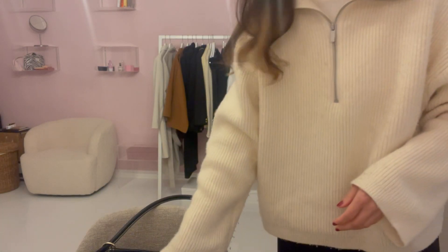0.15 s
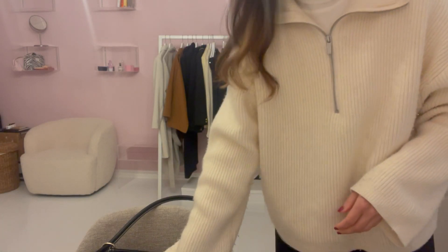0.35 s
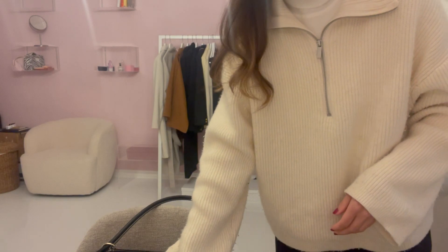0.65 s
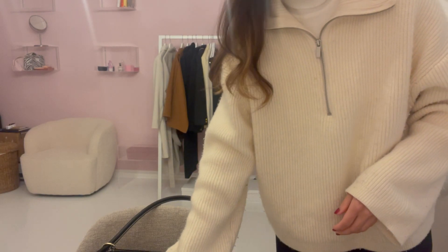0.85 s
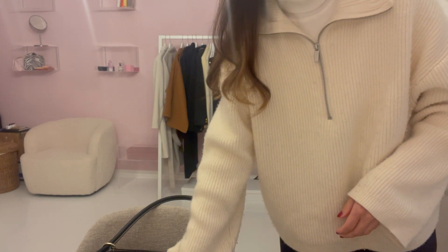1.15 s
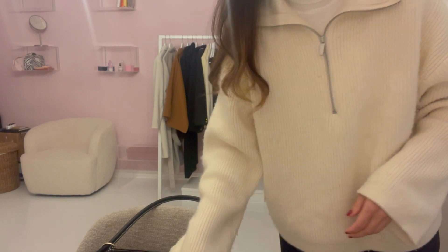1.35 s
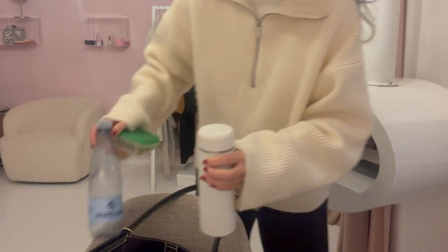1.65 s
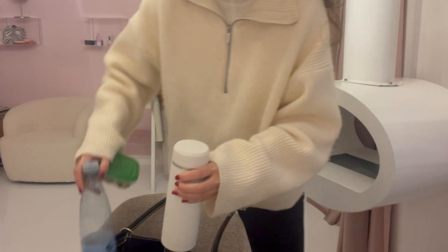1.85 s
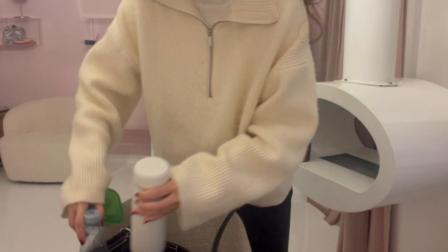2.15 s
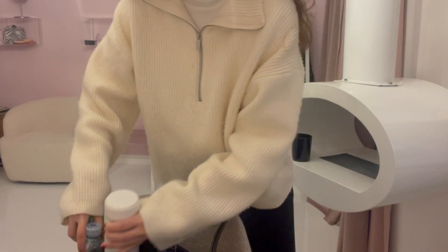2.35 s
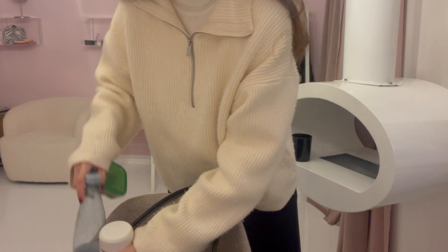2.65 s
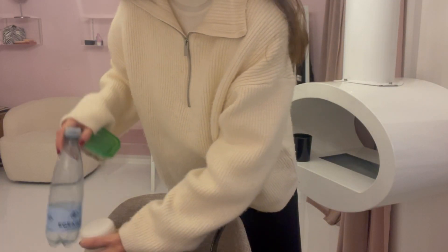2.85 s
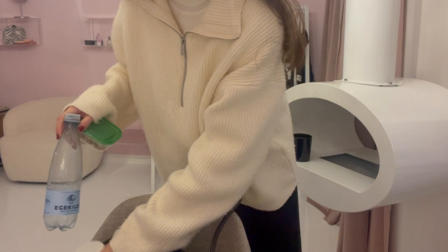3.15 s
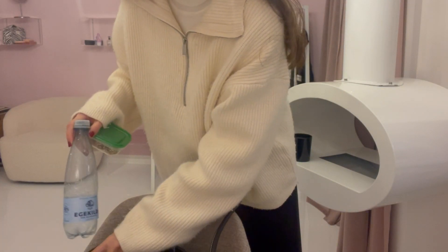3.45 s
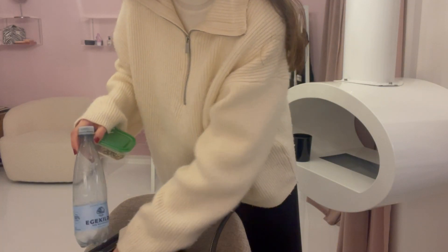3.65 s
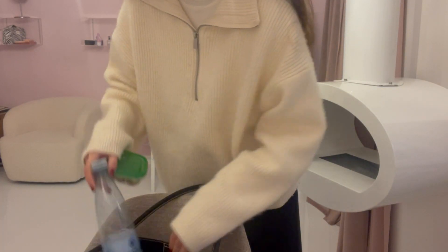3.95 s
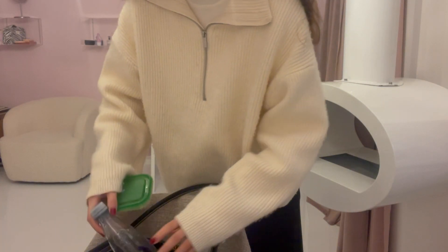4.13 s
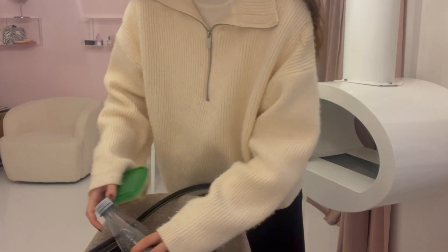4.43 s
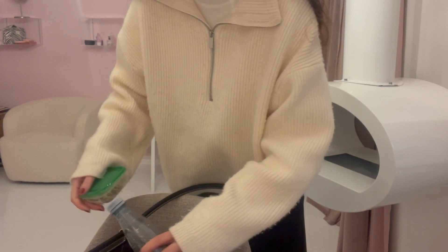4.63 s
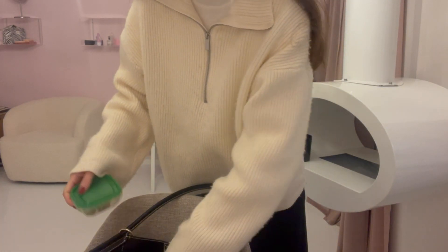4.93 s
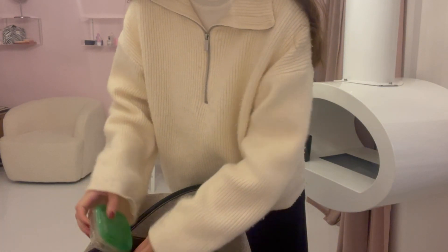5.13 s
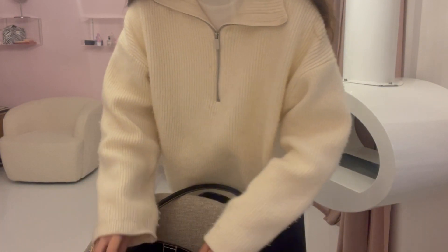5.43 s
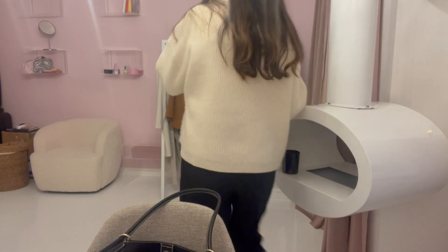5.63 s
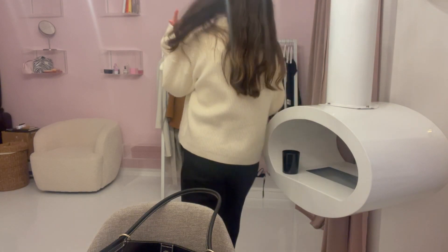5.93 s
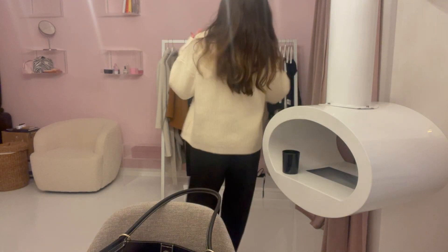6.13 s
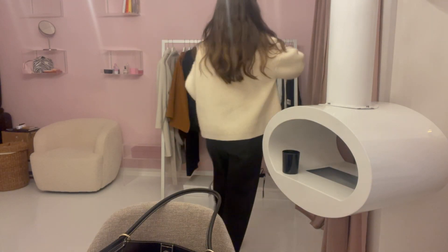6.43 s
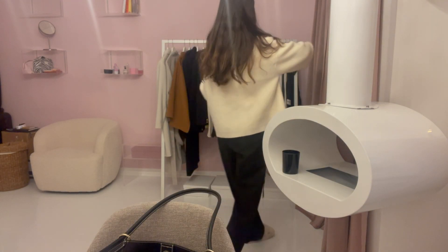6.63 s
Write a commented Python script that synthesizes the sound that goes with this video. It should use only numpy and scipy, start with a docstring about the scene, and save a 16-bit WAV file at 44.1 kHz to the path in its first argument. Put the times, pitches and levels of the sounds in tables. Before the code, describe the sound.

Close stereo microphone in a small room, with faint low rumble and hiss. Leather creaks and rubs with soft thumps, then a quiet pause. A flask goes into a handbag with a dull, boomy thump, sleeves swishing and plastic clicking. A water bottle clatters sharply against it, and a small lidded box drops with a hollow clop. An abrupt cut leaves only soft steps and sweater swish.

```python
"""Packing a leather handbag

In a small room a flask, a plastic water bottle and a small lidded box go into a leather handbag.
Filtered friction noise makes sleeves, lining and scuffs; struck modes and noise bursts make the taps,
the clattering bottle, the dropping box and the thumps on the bottom of the bag. The sound breaks off
and goes on with soft steps and the swish of a sweater, over the faint rumble and hiss of the room."""
import sys
import numpy as np
from scipy import signal
from scipy.fft import rfft
from scipy.io import wavfile
from scipy.ndimage import uniform_filter1d

SR = 44100
rng = np.random.default_rng(int(sys.argv[2]) if len(sys.argv) > 2 else 0)


def generate_wav(signal):
    """Clip the signal to [-1, 1] and save it as 16-bit WAV at the path in sys.argv[1]."""
    frames = np.transpose(np.atleast_2d(signal))
    scaled = np.clip(frames, -1, 1) * 32767
    pcm = np.round(scaled).astype(np.int16)
    wavfile.write(sys.argv[1], SR, pcm)


N = 299206
T = np.arange(N) / SR
RING_T = T[:SR * 3 // 5]  # time axis of a single blow or of the echo


# Colour of rubbed leather: freq_hz, density_db (relative, per Hz)
LEATHER_COLOUR = [(150, 1.5), (250, 4.5), (340, 1.5), (540, -0.5), (850, -9), (1120, -11), (1680, -23),
                  (2300, -40), (4000, -31), (7000, -62), (14000, -82)]
# Colour of sliding fabric: freq_hz, density_db (relative, per Hz)
FABRIC_COLOUR = [(900, -24), (1700, 9.5), (2200, 9.5), (2900, 6), (3400, 4.5), (3900, 4), (4500, 6),
                 (7000, 0), (10000, 4.5), (12500, 1), (16000, 0.5)]
# Colour of the rumbling bag: freq_hz, density_db (relative, per Hz)
BAG_RUMBLE_COLOUR = [(60, -2), (100, -1), (126, 9), (165, -0.5), (212, 3.5), (270, -21.5), (400, -50.5)]
# While hard things lie loose in the bag: from_s, to_s
LOOSE_SPAN = (1.7, 5.55)


def handling(rub_db=-2, swish_db=-3, rumble_db=4.5, sway_s=0.43, jostle_db=-11):
    """Things rub the leather and jostle, sleeves and lining swish and crinkle; rubbing makes the bag rumble."""
    rubbing, swishing = strokes()
    loose = (T > LOOSE_SPAN[0]) & (T < LOOSE_SPAN[1])
    leather = undb(rub_db) * colour(friction(rate=350, spread_db=0.5, smooth=1.0), LEATHER_COLOUR)
    contents = undb(jostle_db) * loose * grains(count=170, centre_hz=1100, t60=0.035)
    swish = colour(friction(rate=900, spread_db=-1.0, smooth=0.76), FABRIC_COLOUR)
    folds = undb(-4) * loose * grains(count=300, centre_hz=3600, t60=.014)
    # the heavy bag follows the rubbing only on average
    sway = uniform_filter1d(rubbing, max(int(sway_s * SR), 1))
    body = undb(rumble_db) * sway * colour(rng.standard_normal(N), BAG_RUMBLE_COLOUR)
    pressure = grip(depth_db=2.3, hold_s=.016)
    rubbed = rubbing * (leather + contents)
    swished = undb(swish_db) * swishing * (swish + folds)
    return (rubbed + swished) * pressure + body


# Strokes of hand and arm: start_s, length_s, leather_rub_db, fabric_swish_db
HAND_STROKES = [(-0.05, 0.055, -44, -66), (0.047, 0.58, -61.5, -68.5), (0.214, 0.027, -51, -63),
                (0.329, 0.18, -49, -69.5), (0.542, 0.12, -52, -80.5), (0.67, 0.2, -51, -85),
                (1.609, 0.072, -52, -63.5), (1.873, 0.071, -45, -63.5), (2.003, 0.11, -56.5, -61.5),
                (2.175, 0.15, -55.5, -59.5), (2.347, 0.11, -57, -59.5), (2.463, 0.16, -47.5, -53),
                (2.621, 0.13, -53, -59.5), (2.744, 0.18, -61.5, -63), (2.919, 0.15, -54.5, -54.5),
                (3.042, 0.061, -49.5, -61), (3.215, 0.11, -64.5, -60.5), (3.303, 0.076, -52.5, -51),
                (3.453, 0.036, -47, -54.5), (3.503, 0.049, -45, -52), (4.126, 0.21, -59.5, -64.5),
                (4.793, 0.29, -48, -54.5), (5.297, 0.16, -46, -55), (5.63, 0.09, -57.5, -68.5),
                (5.785, 0.11, -74, -63), (5.922, 0.048, -48, -53), (5.99, 0.13, -57.5, -65.5),
                (6.136, 0.27, -77, -68.5), (6.39, 0.15, -62.5, -65.5), (6.567, 0.093, -63.5, -65)]
RUB_ATTACK_S, SWISH_ATTACK_S = 0.085, 0.057
STROKE_SAG_DB_PER_S, STROKE_RELEASE_S = 11, 0.039


def strokes():
    """Gains of rubbing and swishing: attack, sagging hold and release, with a separate attack for each."""
    rub, swish = np.zeros(N), np.zeros(N)
    for start, length, rub_db, swish_db in HAND_STROKES:
        t = RING_T - min(start, 0)  # a stroke with a negative start is already under way
        rub_attack = np.sin(np.pi / 2 * np.minimum(t / RUB_ATTACK_S, 1)) ** 2
        swish_attack = np.sin(np.pi / 2 * np.minimum(t / SWISH_ATTACK_S, 1)) ** 2
        release = np.exp(-np.maximum(t - length, 0) / STROKE_RELEASE_S)
        shape = undb(-STROKE_SAG_DB_PER_S * t) * release
        add(rub, start, undb(rub_db) * rub_attack * shape)
        add(swish, start, undb(swish_db) * swish_attack * shape)
    return rub, swish


def grip(depth_db, hold_s):
    """The pressure of the hand wavers at random."""
    steps = np.arange(0, T[-1] + 1, max(hold_s, .005))
    return undb(depth_db * np.interp(T, steps, rng.standard_normal(len(steps))))


# The water bottle tumbles in: start_s, level_db, contact_ms
BOTTLE_BLOWS = [(4.8937, -15, 0.26), (4.8967, -28, 0.28), (4.9047, -16, 0.24), (4.912, -19, 0.4),
                (4.919, -17.5, 0.46), (4.9497, -19, 0.3), (4.9528, -21.5, 0.4), (4.9746, -25.5, 0.88)]
# What its wall rings with: pitch_hz, level_db, t60_s
BOTTLE_WALL = [(300, -10, 0.37), (408, -20.5, 0.58), (480, 0.5, 0.035), (635, -6, 0.094),
               (891, -10.5, 0.15), (1063, 4, 0.089), (1070, 8.5, 0.058), (1140, 1, 0.15), (1507, 0, 0.13),
               (1684, 10, 0.054), (1740, 7, 0.095), (2130, 5, 0.06), (2220, -6, 0.12), (2614, -8, 0.066),
               (2936, -12.5, 0.045), (3390, -3, 0.041), (3630, -1, 0.11), (3847, 1.5, 0.15)]


def bottle(ring_db=-1, crack_db=-6, snap_db=-7, tick_db=-8, rebound_db=-15):
    """The bottle slips from the hand and chatters against the flask; its stiff wall cracks and rings."""
    out = np.zeros(N)
    for start, db, contact_ms in BOTTLE_BLOWS:
        crack = undb(crack_db) * burst(430, 2600, t60=0.024)
        snap = undb(snap_db) * burst(2000, 4100, t60=.012)
        wall = undb(ring_db) * ring(BOTTLE_WALL, detune=0.004, strike_db=4) + crack + snap
        tick = undb(tick_db) * burst(6000, 15000, t60=0.01)
        add(out, start, undb(db) * soften(chatter(wall, rebound_db) + tick, contact_ms))
    return out


def chatter(x, db, rate=300, t60=0.12):
    """A blow is followed by small, irregular rebounds that die away."""
    moments = rng.random(len(x)) < rate / SR
    rebounds = undb(db) * moments * rng.standard_normal(len(x)) * fade(t60)
    return x + signal.fftconvolve(x, rebounds)[:len(x)]


# The box bumps the rim, drops and settles: start_s, level_db, contact_ms
BOX_BLOWS = [(5.1337, -30, 0.43), (5.302, -25, 0.39), (5.3428, -11.5, 0.12), (5.4102, -25, 0.11)]
# What its thin walls ring with: pitch_hz, level_db, t60_s
BOX_WALLS = [(435, 4, 0.28), (523, 0.5, 0.03), (660, 16.5, 0.036), (920, -3, 0.044), (1000, 14, 0.033),
             (1142, 11.5, 0.15), (1486, 0.5, 0.086), (1970, 14.5, 0.033), (2667, 2, 0.069)]
# The lid flexing on the air inside: pitch_hz, swell_s
BOX_LID = (710, .0018)


def box(wall_db=-12, tick_db=-11, rattle_db=-14.5):
    """The box lands with a sharp tick; its lid swells briefly into a hollow clop; walls and contents ring on."""
    hz, swell_s = BOX_LID
    lid_swell = RING_T / swell_s * np.exp(1 - RING_T / swell_s)
    lid = lid_swell * np.sin(2 * np.pi * hz * RING_T)
    clop = 0.73 * lid + undb(wall_db) * ring(BOX_WALLS)
    out = np.zeros(N)
    for start, db, contact_ms in BOX_BLOWS:
        contents = undb(rattle_db) * burst(570, 1050, t60=0.1374, rise_s=0.00057)
        tick = undb(tick_db) * burst(1400, 16500, t60=0.025)
        add(out, start, undb(db) * soften(clop + contents + tick, contact_ms))
    return out


# Light taps among the things: start_s, level_db, hardness (0 leather, 0.5 plastic, 1 metal fitting)
LIGHT_TAPS = [(0.073, -45, 0.015), (0.298, -46, 0.018), (0.375, -45, 0.036), (0.435, -35.5, 0.096),
              (0.444, -30, 0.088), (1.7593, -30.5, 0.32), (1.906, -33, 0.33), (2.0012, -38, 0.44),
              (2.217, -50.5, 0.82), (2.272, -34, 0.69), (2.395, -53.5, 0.67), (2.767, -55.5, 0.81),
              (2.907, -48.5, 0.29), (2.946, -48, 0.2), (3.045, -32, 0.16), (3.063, -37.5, 0.035),
              (3.133, -52, 0.75), (3.326, -46, 0.71), (3.344, -35.5, 0.84), (3.355, -40.5, 0.78),
              (3.366, -47, 1), (3.387, -41.5, 1), (3.3908, -48, 1), (3.434, -46, 0.8), (3.467, -39.5, 0.83),
              (3.541, -39, 0.21), (3.56, -45, 0.72), (3.881, -47, 0.68), (4.02, -35.5, 0.62),
              (4.178, -47, 0.36), (4.243, -46, 0.75), (4.272, -44, 0.27), (4.331, -41.5, 0.68),
              (4.684, -26.5, 0.36), (4.702, -38, 0.68), (4.818, -35.5, 0.5), (4.852, -32, 0.5),
              (5.017, -37, 0.6), (5.093, -38, 0.15), (5.136, -29.5, 0.4), (5.215, -40, 0.25),
              (5.471, -35.5, 0.59), (5.642, -48, 0.17), (5.948, -42.5, 0.86), (6.438, -49, 0.25)]
# What tapped plastic rings with: pitch_hz, level_db, t60_s
PLASTIC_MODES = [(1120, 1.5, 0.039), (1275, -3, 0.0074), (1648, 3.5, 0.036), (2115, 6, 0.011),
                 (2580, 6.5, 0.015), (3160, 0.5, 0.015)]
# What the tapped bag rings with: pitch_hz, level_db, t60_s
LEATHER_MODES = [(162.7, -2, 0.27), (229, -6, 0.24), (308.5, -12, 0.33), (423, -7.5, 0.015),
                 (553, 0.5, 0.034), (640, -8.5, 0.0217)]
HARDNESS_DB = 45  # fading of a voice per unit of hardness away from its own, relative to the nearest voice


def taps(knock_db=5, click_db=3, thud_db=3, contact_ms=0.29):
    """Soft taps are a hollow, scuffing thud of the bag, harder ones a plastic knock, the hardest a bare click."""
    out = np.zeros(N)
    for start, db, hardness in LIGHT_TAPS:
        away = np.abs(hardness - np.array([0, .5, 1]))
        thud, knock, click = db - HARDNESS_DB * (away - away.min())
        wall = ring(PLASTIC_MODES, detune=.045, strike_db=4)
        plastic = wall + .2 * burst(900, 4000, t60=0.06)
        leather = ring(LEATHER_MODES, detune=0.056) + .5 * burst(410, 754, t60=0.028)
        blow = undb(knock + knock_db) * plastic + undb(thud + thud_db) * leather
        bare_click = undb(click + click_db) * burst(4000, 14620, t60=0.011)
        add(out, start, soften(blow, contact_ms) + bare_click)
    return out


# Things landing on the bottom of the bag: start_s, level_db, pitch_hz
BAG_THUMPS = [(0.076, -41, 140.6), (0.365, -37, 153), (0.438, -28.5, 190), (0.452, -29, 130),
              (0.503, -30, 111.6), (1.909, -37.5, 145), (2.03, -35, 164.6), (2.056, -21.5, 129),
              (2.602, -30, 145), (4.25, -40.5, 116.6), (4.687, -41, 189), (4.821, -36.5, 147),
              (5.344, -35.5, 149.5), (5.493, -40.5, 222), (5.518, -45.5, 111)]
# Weight bearing on the chair under the bag: start_s, level_db
SEAT_BOOMS = [(1.763, -42.5), (2.095, -25), (2.539, -36), (3.093, -46.5), (5.124, -44), (5.408, -50.5)]
THUMP_T60_S = 0.22
SEAT_HZ, SEAT_T60_S = 127.1, 0.56


def thumps(bag_db=1, seat_db=1):
    """The bottom of the bag thumps briefly; the seat beneath it booms on at one pitch."""
    out = np.zeros(N)
    for start, db, hz in BAG_THUMPS:
        add(out, start, undb(db + bag_db) * boom(hz, THUMP_T60_S))
    for start, db in SEAT_BOOMS:
        add(out, start, undb(db + seat_db) * boom(SEAT_HZ, SEAT_T60_S))
    return out


# Things dragged over the rim and the seams: start_s, length_s, level_db, centre_hz
RIM_SCRAPES = [(0.433, 0.11, -47.5, 310), (0.44, 0.083, -56.5, 2070), (1.753, 0.06, -52.5, 1540),
               (2.007, 0.061, -52, 2250), (2.014, 0.087, -46, 420), (2.642, 0.11, -54, 11500),
               (2.817, 0.054, -56, 5500), (2.82, 0.082, -53.5, 11500), (3.336, 0.11, -52.5, 650),
               (4.224, 0.22, -68, 645), (4.337, 0.065, -60, 2030), (4.673, 0.094, -42, 284),
               (4.822, 0.1, -47, 1440), (4.838, 0.062, -43, 657), (5.396, 0.027, -56, 633),
               (5.463, 0.063, -42.5, 287)]
SCRAPE_OCTAVES = 1.26  # width of the band of a scrape


def scrapes(gain_db=0, ring_share=0.27, attack_s=0.0066, release_s=0.051):
    """Dense stick-slip clicks, partly heard through ringing plastic, each drag in its own register."""
    slips, out = friction(rate=840, spread_db=0.5, smooth=0.32), np.zeros(N)
    reach = 2 ** (SCRAPE_OCTAVES / 2)
    for start, length, db, hz in RIM_SCRAPES:
        catches = slips[int(start * SR):int((start + max(length, .01)) * SR)]
        t = T[:len(catches)]
        plastic = signal.fftconvolve(catches, ring(PLASTIC_MODES, detune=0.1005))[:len(t)]
        both = unit(catches) + ring_share * unit(plastic)
        drag = unit(band(both, hz / reach, hz * reach))
        shape = np.minimum(t / attack_s, 1) * np.minimum((t[-1] - t) / release_s, 1)
        add(out, start, undb(db + gain_db) * drag * shape)
    return out


# Flask and bottle sliding against each other and the rim: start_s, length_s, level_db, register_hz
SHELL_SLIDES = [(2.33, 0.18, -68.5, 1950), (2.526, 0.0072, -43.5, 1660), (2.55, 0.15, -59.5, 1450),
                (2.94, .11, -75, 2350), (3, 0.15, -69.5, 3950), (3.325, 0.056, -58.5, 2790),
                (4.81, 0.048, -55, 2620), (4.98, 0.14, -57.5, 1634), (5.03, 0.08, -60, 4200)]
# What their shells ring with: pitch_hz, level_db, t60_s
SHELL_RINGS = [(1164, 3.5, 0.029), (1667, -0.5, 0.056), (2040, -1, 0.021), (2793, -2.5, 0.043),
               (3430, -9.5, 0.045), (3860, -5, 0.089), (4930, -5, .025)]


def slides(gain_db=0, focus_db_per_octave=11):
    """Flask and bottle judder past each other; slips ring their shells, most near the contact's register."""
    slips, out = friction(rate=170, spread_db=3, smooth=0.068), np.zeros(N)
    for start, length, db, centre_hz in SHELL_SLIDES:
        push = swell(length)
        modes = []
        for hz, level_db, t60 in SHELL_RINGS:
            octaves_away = abs(np.log2(hz / centre_hz))
            modes.append((hz, level_db - focus_db_per_octave * octaves_away, t60))
        pushed_slips = push * slips[int(start * SR):][:len(push)]
        shell = signal.fftconvolve(pushed_slips, ring(modes, detune=0.012))
        add(out, start, undb(db + gain_db) * shell / np.sqrt(np.sum(shell ** 2) / len(push)))
    return out


# Hand and things dragged along the lining, then soles scuffing: start_s, length_s, level_db, relative_speed
LINING_DRAGS = [(0.627, 0.14, -54, 0.98), (0.752, 0.11, -53, 0.94), (4.336, 0.27, -71.5, 1.26),
                (5.627, 0.076, -59.5, 1.37), (5.802, 0.15, -57, 1.15), (6.044, 0.41, -70.5, 1.1),
                (6.413, 0.098, -55.5, 1.05), (6.57, 0.12, -62, 1)]
# Colour of the scuff: freq_hz, density_db (relative, per Hz)
SCUFF_COLOUR = [(150, -3), (380, 1), (520, 4), (700, -1), (870, -3), (1130, -.5), (1280, -6), (1500, -16),
                (2200, -21), (5000, -45)]


def drags(gain_db=0, sag=0.1415):
    """A dense, dull scuff on cloth swells and fades; its resonances sink as the movement slows."""
    scuff = colour(friction(rate=2300, spread_db=2.0, smooth=0.58), SCUFF_COLOUR)
    out = np.zeros(N)
    for start, length, db, speed in LINING_DRAGS:
        push = swell(length)
        slowing = speed * (1 + sag * np.linspace(.5, -.5, len(push)))
        travel = start * SR + np.cumsum(slowing)
        add(out, start, undb(db + gain_db) * push * np.interp(travel, np.arange(N), scuff, period=N))
    return out * grip(depth_db=2.5, hold_s=.012)


# Shifts of weight and steps on the floor: start_s, level_db
SOFT_STEPS = [(0.484, -44), (2.098, -47), (2.533, -50.5), (6.004, -48.5), (6.443, -52), (6.619, -45)]
# What the floor rings with: pitch_hz, level_db, t60_s
FLOOR_RINGS = [(53.15, 6.5, 0.67), (120.1, -0.5, 0.29)]


def footfalls(gain_db=1):
    """Soft feet set the floor ringing."""
    floor = sum(undb(db) * boom(hz, t60) for hz, db, t60 in FLOOR_RINGS)
    out = np.zeros(N)
    for start, db in SOFT_STEPS:
        add(out, start, undb(db + gain_db) * floor)
    return out


# Decay of the small room: freq_hz, t60_s
ECHO_DECAY = [(100, 0.36), (500, 0.39), (1500, 0.31), (5000, 0.25), (15000, 0.01)]
# Width of the echo: freq_hz, side_to_mid_ratio
ECHO_WIDTH = [(120, 0.12), (280, 0.96), (700, 1.6), (1100, 1.14), (4000, 1.36), (8000, 0.12)]


def room(dry, wet_db=-4, treble_db=2, bass_db=-4, gap_s=0.003):
    """Close walls answer after a few ms; their tail spreads most widely in the middle register."""
    response, edges = np.zeros((2, len(RING_T))), np.geomspace(60, 17000, 10)
    onset = np.clip(RING_T / gap_s - .5, 0, 1)  # silent for half the gap, full at one and a half
    tone = [(150, bass_db), (600, 0.018), (2000, 0.0016), (7000, treble_db)]  # freq_hz, level_db
    for lo, hi in zip(edges, edges[1:]):
        hz = np.sqrt(lo * hi)
        mid, side = band(rng.standard_normal((2, len(RING_T))), lo, hi, order=3)
        spread = mid + along(ECHO_WIDTH, hz) * np.array([side, -side])
        tail = spread * fade(along(ECHO_DECAY, hz)) * onset
        db = wet_db + along(tone, hz)
        # energy in proportion to the width of the band
        response += undb(db) * tail * np.sqrt((hi - lo) / SR * 4 / np.sum(tail ** 2))
    return signal.fftconvolve(dry[None], response, axes=1)[:, :N]


# Colour of the still room: freq_hz, density_db (relative, per Hz)
AIR_COLOUR = [(20, -49.5), (36, -1), (52, -5.5), (75, -18.5), (120, -7), (210, -28), (400, -37.5),
              (1500, -46.5), (5000, -52.5), (16000, -56)]


def air(level_db=-59, side_db=-12):
    """Low rumble of the building with a trace of hiss, as steady noise slightly spread to the sides."""
    mid, side = (colour(rng.standard_normal(N), AIR_COLOUR) for _ in range(2))
    return undb(level_db) * (mid + undb(side_db) * np.array([side, -side]))


def friction(rate, spread_db, smooth):
    """Fibres catch and slip: tiny clicks of uneven size, rate per second, over a smooth hiss."""
    moments = rng.random(N) < rate / SR
    sizes = undb(spread_db * np.minimum(rng.exponential(size=N), 4))
    slips = moments * rng.choice([-1, 1], N) * sizes
    return unit(slips) + smooth * rng.standard_normal(N)


def grains(count, centre_hz, t60, range_db=20, octaves=2.2):
    """Loose things touch and folds snap at random, each with its own strength and brief pitch. Rms 1."""
    out = np.zeros(N)
    for when, size, pitch in rng.random((count, 3)):
        hz = centre_hz * 2 ** (octaves * (pitch - .5))
        add(out, when * T[-1], undb(-range_db * (1 - size)) * burst(hz / 1.7, hz * 1.21, t60))
    return unit(out)


def burst(lo_hz, hi_hz, t60, rise_s=0.00041):
    """A short crack of countless fast-dying modes, as band-passed noise levelled by its energy."""
    noise = rng.choice([-1., 1.], len(RING_T))
    x = band(noise * fade(t60) * (1 - np.exp(-RING_T / rise_s)), lo_hz, hi_hz)
    return x / np.sqrt(np.sum(x ** 2) / (t60 * SR) * 20)


def ring(modes, detune=0., strike_db=0.):
    """Struck modes, detuned a little by the hand's grip, louder or softer with the spot that is hit. Peak 1."""
    shift, spot = rng.standard_normal((len(modes), 2)).T
    x = np.zeros(len(RING_T))
    for a, b, (hz, db, t60) in zip(shift, spot, modes):
        tone = np.sin(2 * np.pi * hz * (1 + detune * a) * RING_T)
        x += undb(db + strike_db * b) * fade(t60) * tone
    return x / np.abs(x).max()


def boom(hz, t60, rise_s=0.0041):
    """A padded blow swells over a cycle or so and rings at one low pitch."""
    return (1 - np.exp(-RING_T / rise_s)) * fade(t60) * np.sin(2 * np.pi * hz * RING_T)


def soften(x, contact_ms):
    """A longer contact pushes more gently and leaves out the treble."""
    push = (RING_T * np.exp(-RING_T * 4000 / contact_ms))[:256]  # strongest after a quarter of the contact
    return signal.lfilter(push / push.sum(), 1, x)


def swell(length):
    """A smooth rise and fall over length seconds, at least 10 ms."""
    return np.sin(np.linspace(0, np.pi, int(max(length, .01) * SR)))


def fade(t60):
    """Exponential decay by 60 dB in t60 seconds."""
    return np.exp(-np.log(1000) * RING_T / t60)


def add(track, s, sound):
    """Mix a sound into the track at time s."""
    start = max(int(s * SR), 0)
    track[start:start + len(sound)] += sound[:N - start]


def undb(db):
    """Decibels to gain."""
    return 10 ** (np.asarray(db) / 20)


def unit(x):
    """Scale to rms 1."""
    return x / np.sqrt(np.mean(x ** 2))


def along(points, hz):
    """Read (Hz, value) points on a log-frequency axis."""
    f, value = np.transpose(points)
    return np.interp(np.log(hz + 1), np.log(f), value)


def bins(x):
    """Frequencies of the spectrum of x."""
    return np.fft.rfftfreq(x.shape[-1], 1 / SR)


def colour(x, points):
    """Weight the spectrum of x by (Hz, dB) points, at rms 1."""
    return unit(np.fft.irfft(rfft(x) * undb(along(points, bins(x))), len(x)))


def band(x, lo_hz, hi_hz, order=2):
    """Causal band-pass."""
    edges = [lo_hz, min(hi_hz, SR / 2 - 1)]
    return signal.sosfilt(signal.butter(order, edges, "band", fs=SR, output="sos"), x)


BREAK_S = 5.552  # the packing is silent from here on


def scene(shade_db=-4):
    """Packing, broken off together with its echo, then the walk across the room."""
    blows = taps() + bottle() + box()
    rustle = handling() + scrapes() + slides() + drags()
    packing = np.clip((BREAK_S - T) / .004, 0, 1)
    walking = np.clip((T - BREAK_S - .05) / .04, 0, 1)
    # the open bag beams the treble of the blows forward, so less of it reaches the walls
    spread = band(blows, 20, 6000, order=1) + rustle
    echo = packing * room(spread * packing) + room(spread * walking)
    # bag and body shade the rustle, so more of it arrives by way of the walls
    direct = blows + undb(shade_db) * rustle + thumps()
    return direct * (packing + walking) + echo + footfalls() + air()


# Balance of the microphone ports: freq_hz, left_minus_right_db
PORT_BALANCE = [(60, -6), (150, -3), (320, -7), (650, -2), (1200, -2), (2200, -2.5), (4400, -7),
                (9000, 0.5), (15000, -0.5)]
PORT_LAG_S, PORT_SHADE_HZ = .000172, 4300  # the right port lags above this frequency
LOW_CUT_HZ, TOP_HZ = 27, 16000


def record(dry):
    """Two microphone ports: the right hears the lows more strongly and the treble later; both ends are cut."""
    hz = bins(dry)
    lean_db = along(PORT_BALANCE, hz)
    lag_s = PORT_LAG_S * hz ** 6 / (hz ** 6 + PORT_SHADE_HZ ** 6)
    late = np.exp(-2j * np.pi * hz * lag_s)
    low_cut = hz ** 4 / (hz ** 4 + LOW_CUT_HZ ** 4)
    ports = np.array([undb(lean_db / 2), undb(-lean_db / 2) * late])
    heard = np.fft.irfft(rfft(dry) * low_cut * ports, N)
    return signal.sosfilt(signal.ellip(8, .2, 70, TOP_HZ, fs=SR, output="sos"), heard)


dry = scene()
out = record(dry)
generate_wav(out)
```